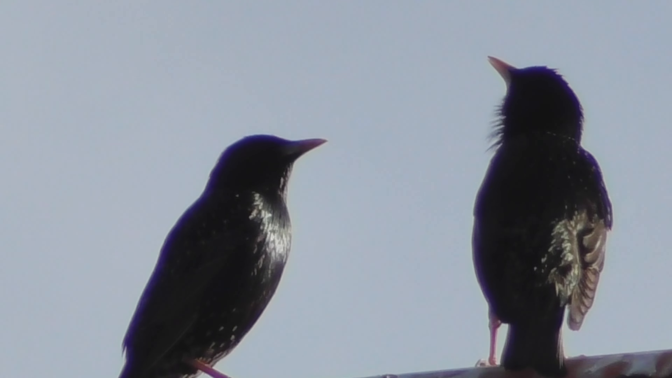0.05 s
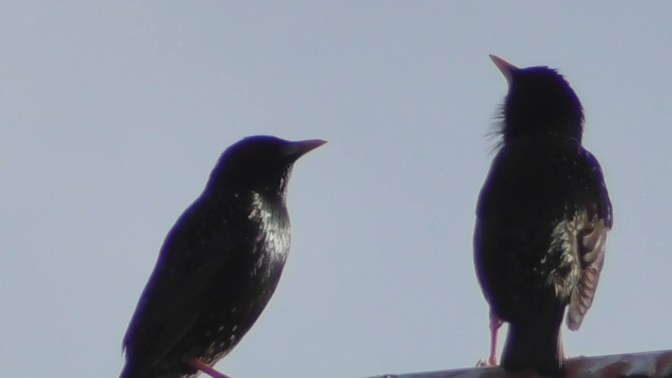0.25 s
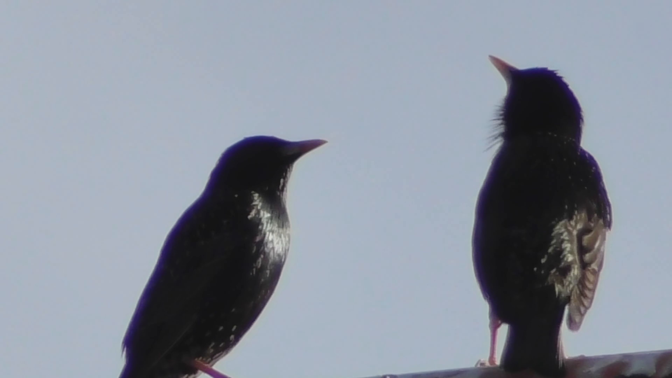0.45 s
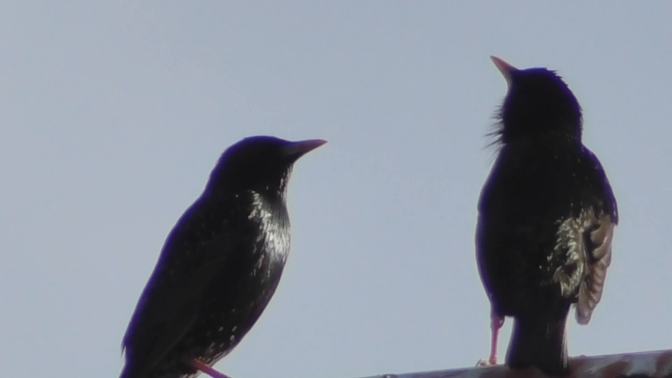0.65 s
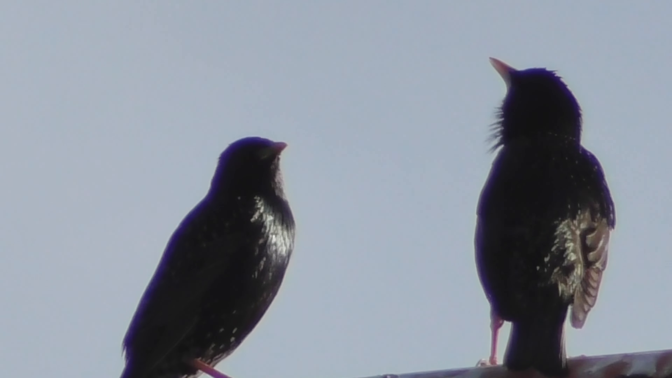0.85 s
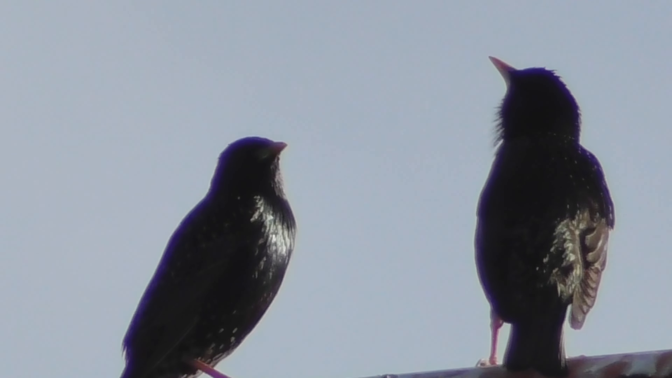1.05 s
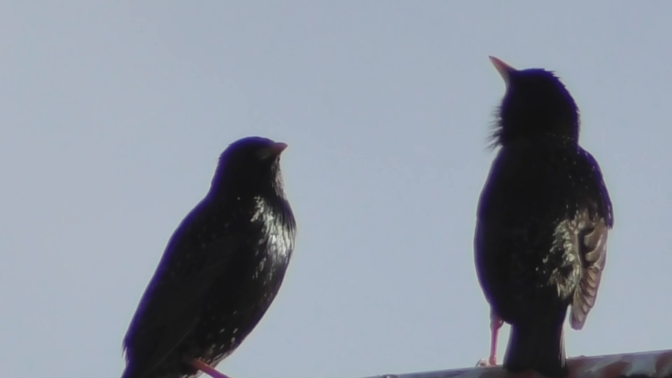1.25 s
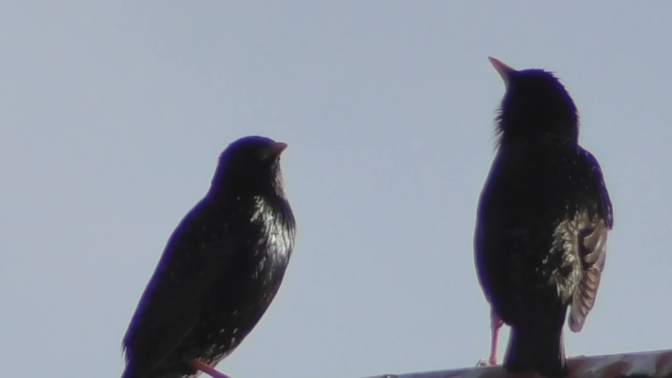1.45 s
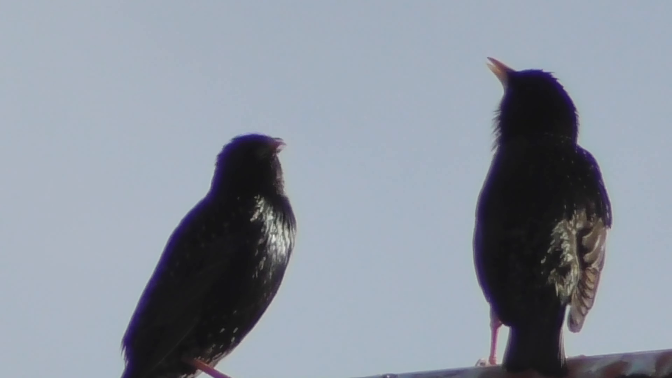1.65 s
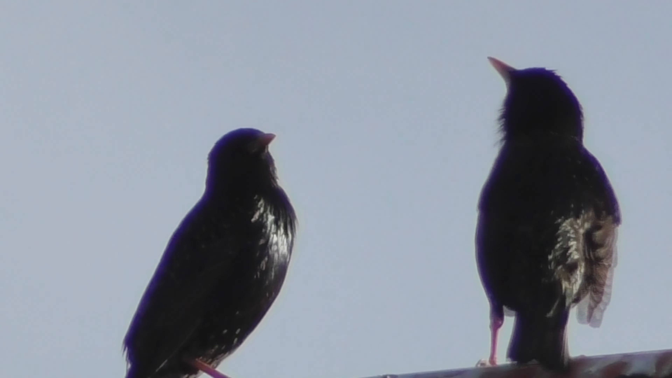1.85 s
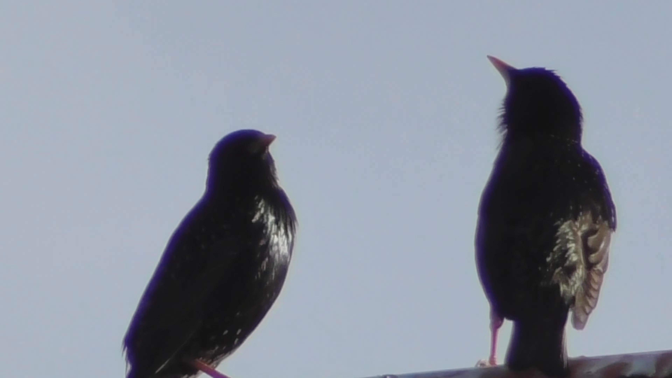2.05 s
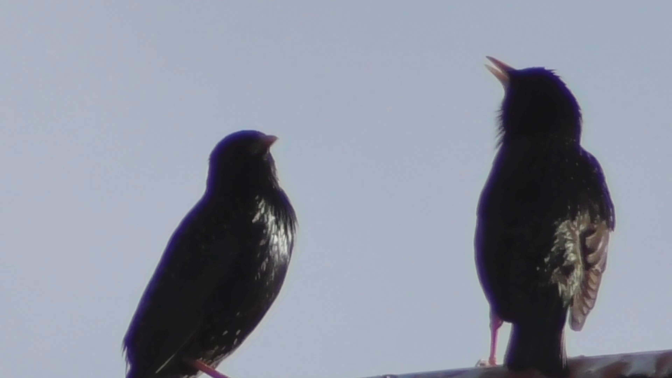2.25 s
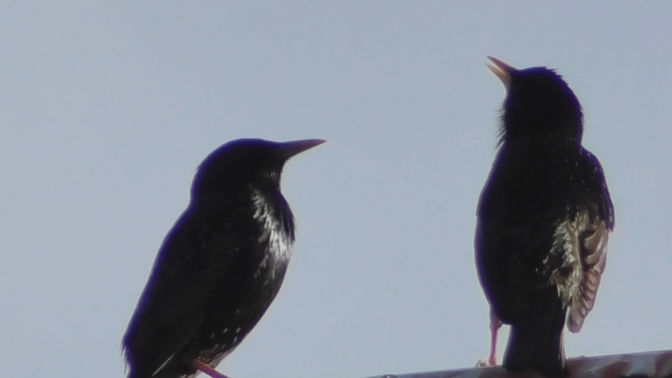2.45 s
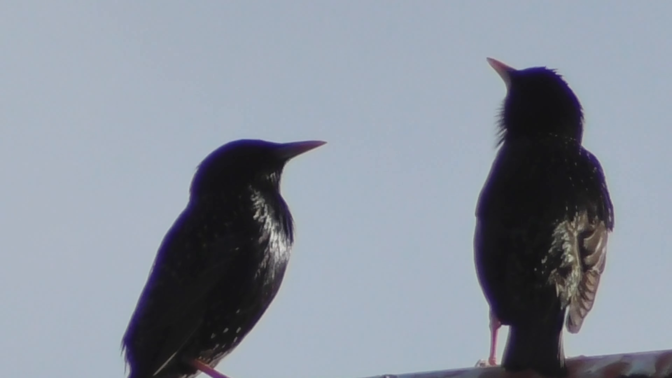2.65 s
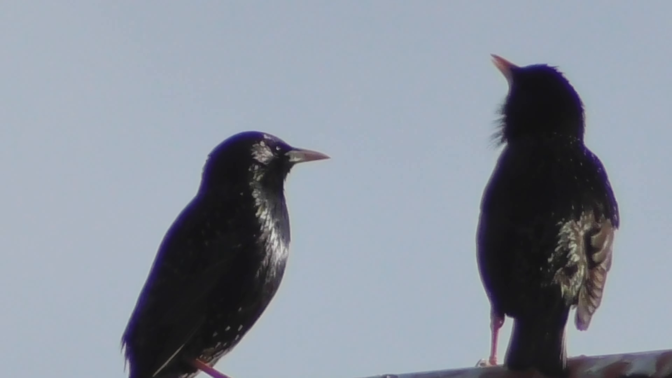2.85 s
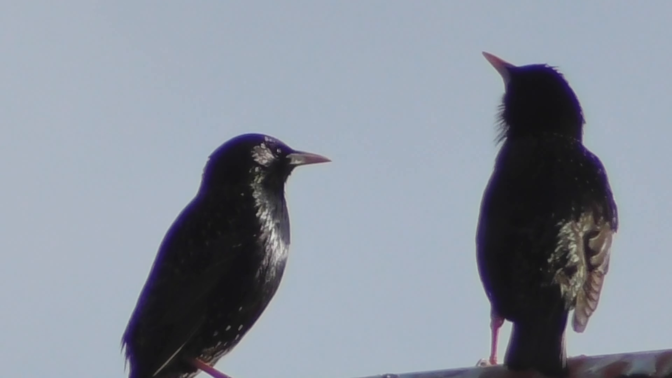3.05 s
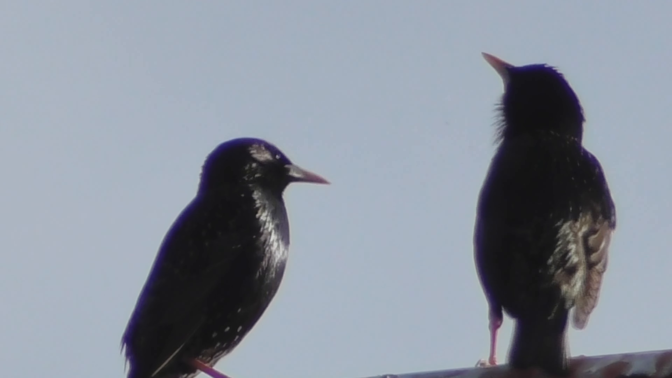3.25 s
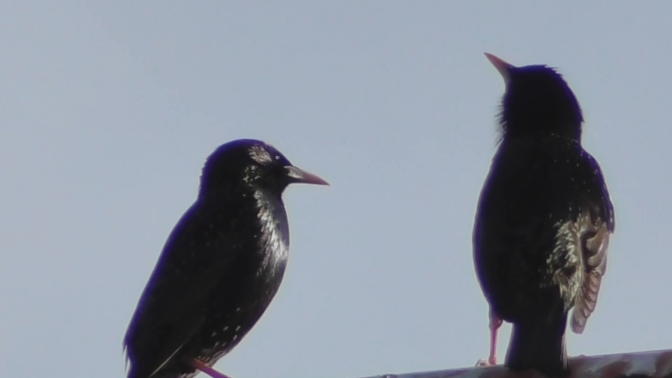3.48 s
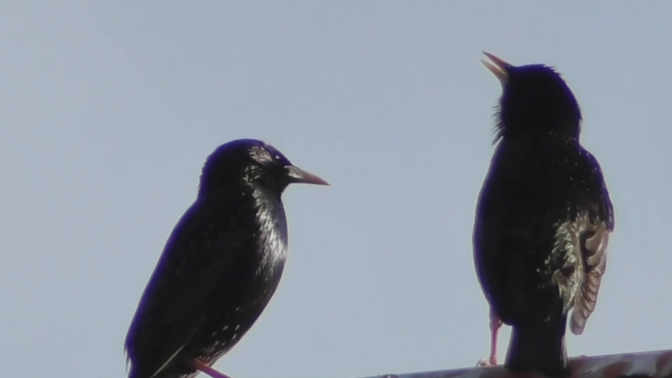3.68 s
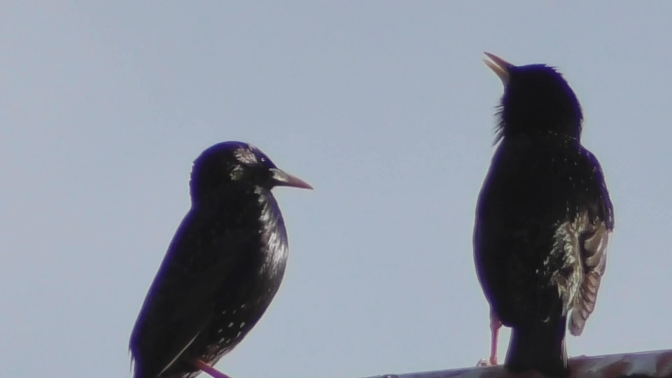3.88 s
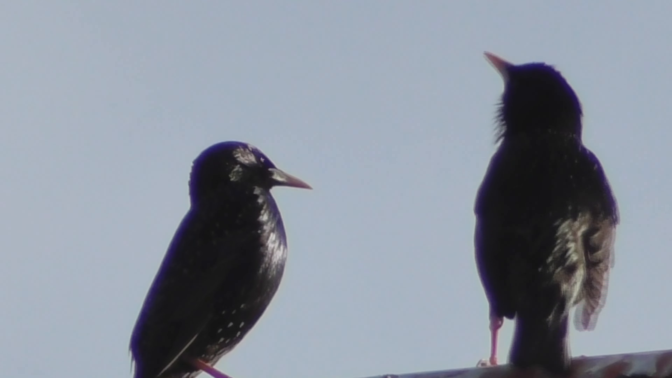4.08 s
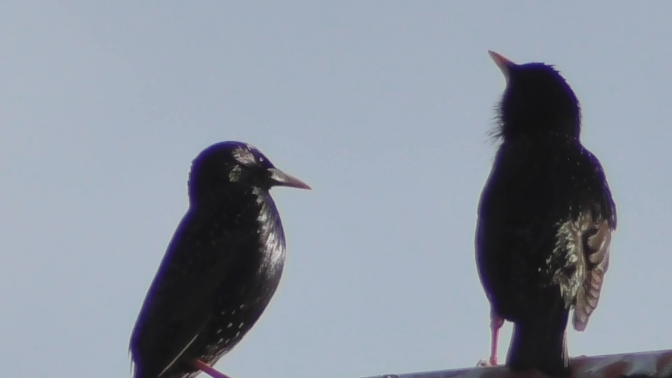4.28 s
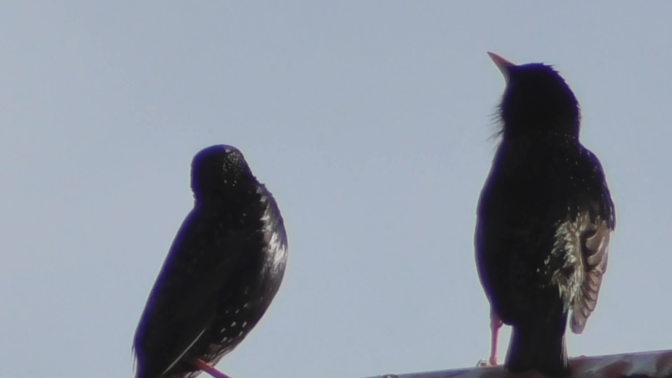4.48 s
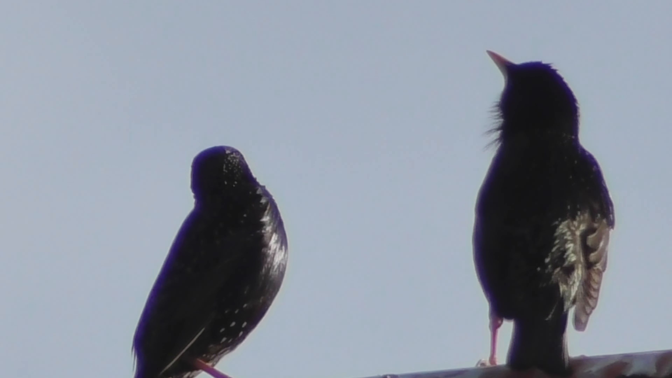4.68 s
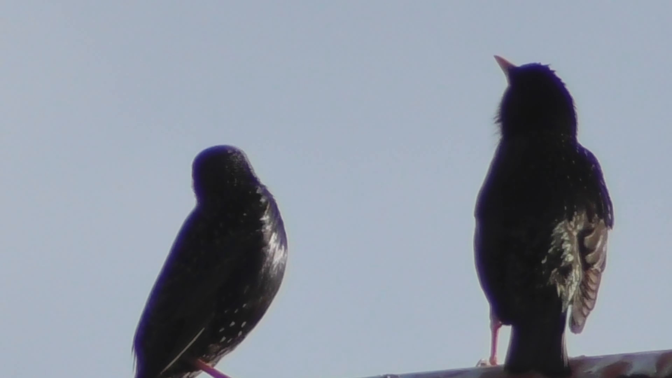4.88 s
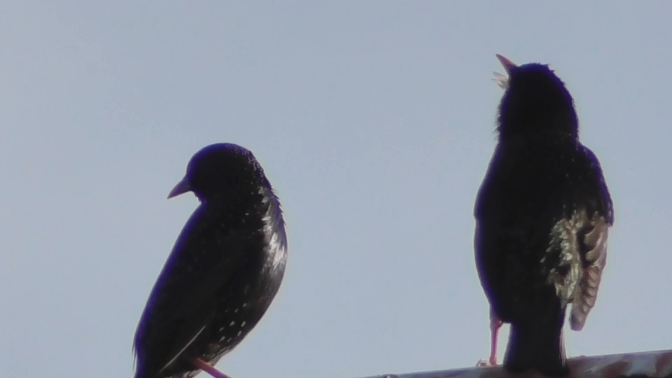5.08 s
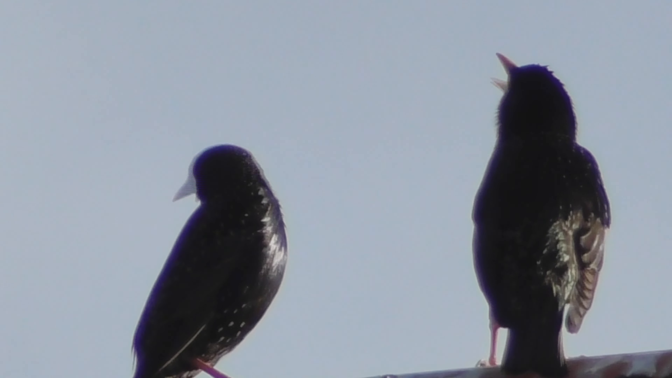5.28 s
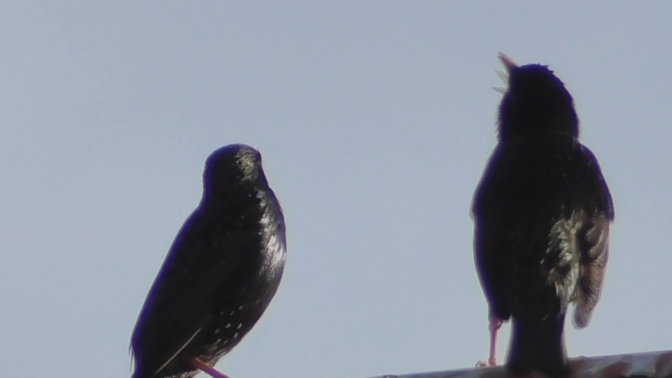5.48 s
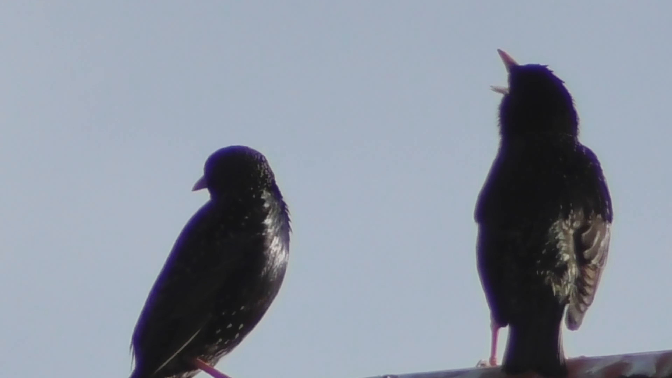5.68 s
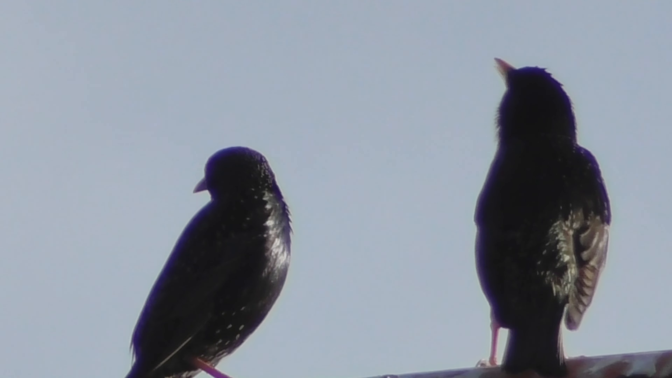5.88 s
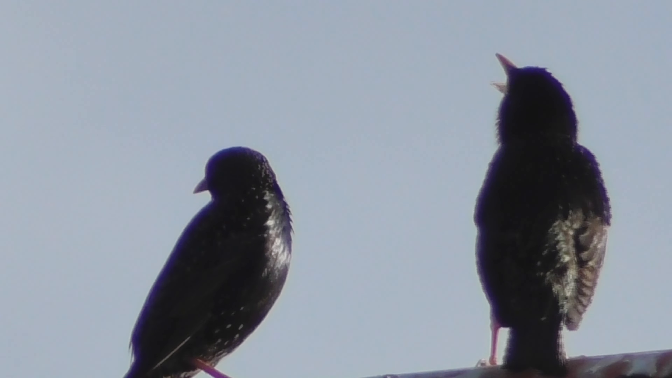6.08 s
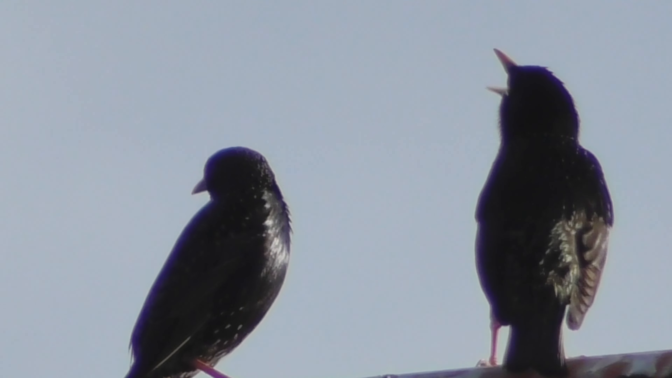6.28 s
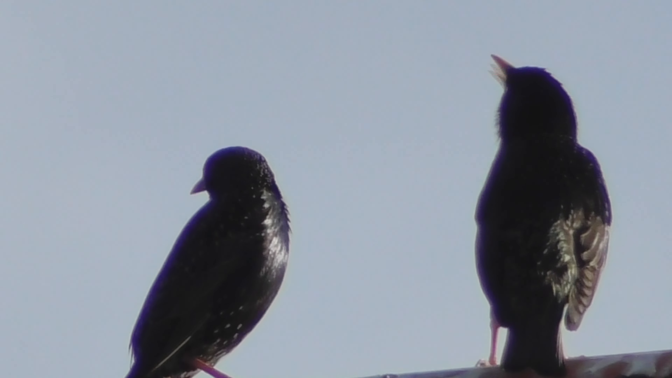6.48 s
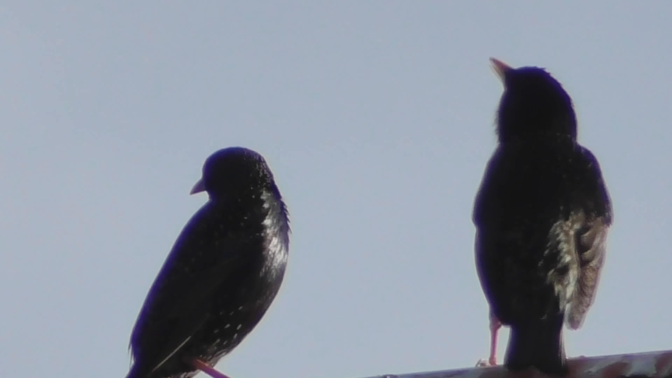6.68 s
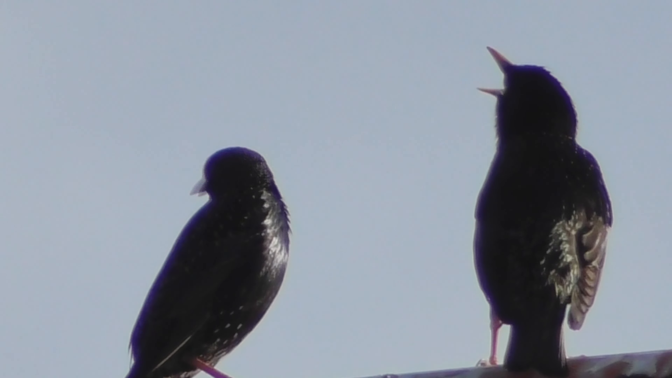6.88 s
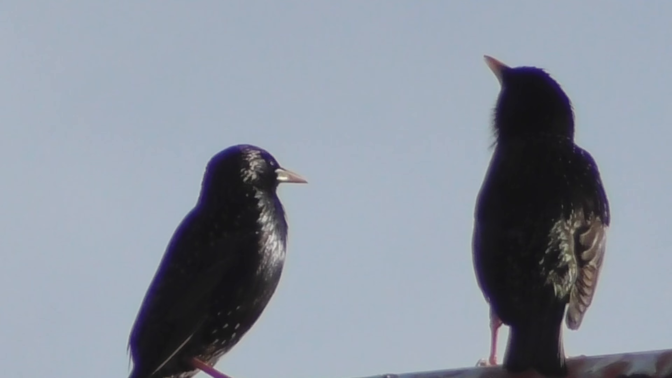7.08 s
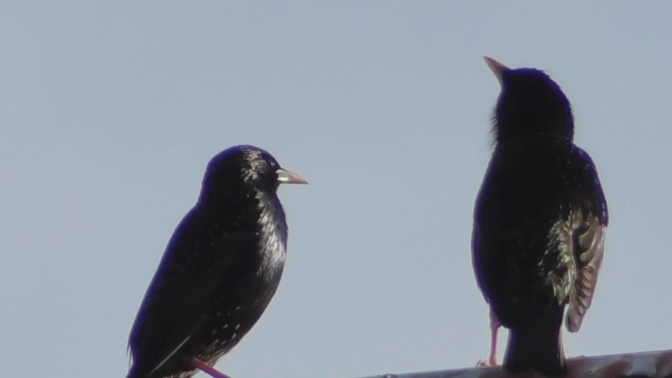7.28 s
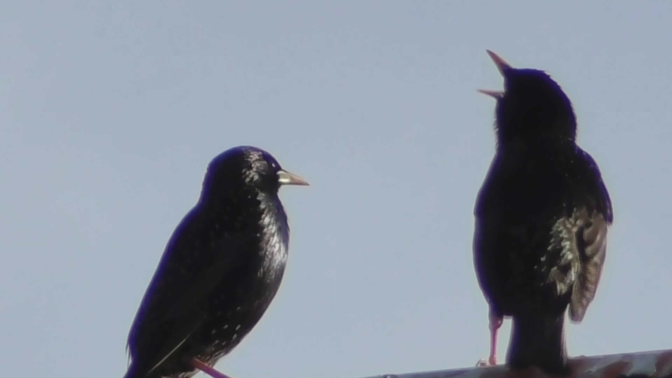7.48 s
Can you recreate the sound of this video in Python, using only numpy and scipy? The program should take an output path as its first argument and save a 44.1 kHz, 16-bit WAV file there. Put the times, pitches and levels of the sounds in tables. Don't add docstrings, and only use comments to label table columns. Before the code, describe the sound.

A small stereo microphone below a roof edge picks up a starling close by, slightly right, and sparrows scattered further away, blurred by wall reflections. Chirps and quiet rattles, squeaks and ticks continue over far-off road hum and hiss. A held high note with a fast warble then introduces three very bright, strong whistles that ripple up and down, separated by snaps and rasping chirps, before faint clicking closes the passage.

```python
import sys
import numpy as np
from scipy import signal
from scipy.fft import rfft, irfft
from scipy.io import wavfile
from scipy.ndimage import uniform_filter1d

SR = 44100
rng = np.random.default_rng(int(sys.argv[2]) if len(sys.argv) > 2 else 0)


def amplitude_ratio(level_db):
    exponent = np.asarray(level_db, float) / 20
    return 10 ** exponent


def generate_wav(sig):
    pcm = np.round(np.clip(np.atleast_2d(sig).T, -1, 1) * 32767).astype(np.int16)
    wavfile.write(sys.argv[1], SR, pcm)


N = 332073
TIME = np.arange(N) / SR


def coloured(x, spectrum):
    hz, db = np.transpose(spectrum)
    grid = np.fft.rfftfreq(len(x), 1 / SR) + 1
    gain = amplitude_ratio(np.interp(np.log(grid), np.log(hz), db))
    y = irfft(rfft(x) * gain, len(x))
    return y / y.std()


def drift(rate):
    lowpass = signal.butter(2, rate, fs=SR, output="sos")
    y = signal.sosfilt(lowpass, rng.standard_normal(N + SR))[SR:]
    return y / y.std()


def bandpass(x, low_hz, high_hz):
    return signal.sosfilt(signal.butter(3, [low_hz, high_hz], "band", fs=SR, output="sos"), x)


def resonance(x, hz, width_hz):
    r = np.exp(-np.pi * width_hz / SR)
    zeros = [(1 - r * r) / 2, 0, (r * r - 1) / 2]
    poles = [1, -2 * r * np.cos(2 * np.pi * hz / SR), r * r]
    return signal.lfilter(zeros, poles, x + 1e-18)


def controls(rows, t, smooth_s=0.0023):
    s, hz, db = np.transpose(rows)
    sounding = (t >= s[0]) * (t <= s[-1])
    height = np.sqrt(2) * amplitude_ratio(np.interp(t, s, db)) * sounding
    span = max(int(smooth_s * SR), 1)
    return uniform_filter1d(np.interp(t, s, hz), span), uniform_filter1d(height, span)


def phase(hz):
    return 2 * np.pi * np.cumsum(hz) / SR


def voice(notes, second_db, third_db, wobble, flutter, throb_db=0.0):
    out = np.zeros(N)
    shake = 1 + wobble * drift(268)
    strength = (1 + flutter * drift(365)) * amplitude_ratio(throb_db * drift(60))
    for rows in notes:
        first = max(int(rows[0][0] * SR) - 300, 0)
        last = min(int(rows[-1][0] * SR) + 300, N)
        on = np.arange(first, last)
        hz, height = controls(rows, on / SR)
        turn = phase(hz * shake[on])
        overtones = amplitude_ratio(second_db) * np.sin(2 * turn) + amplitude_ratio(third_db) * np.sin(3 * turn)
        out[on] += height * (np.sin(turn) + overtones)
    return out * strength


def glides(rows):
    return [[(s, a, db - 5),
             (s + .3 * d, .7 * a + .3 * b, db),
             (s + .8 * d, .2 * a + .8 * b, db),
             (s + d, b, db - 7)] for s, d, a, b, db in rows]


def chirps(shape, rows):
    length_s = shape[-1][0]
    return [[(start + s, hz * factor, db + level_db + lean_db * s / length_s + catch_db * (k == 5))
             for k, (s, hz, db) in enumerate(shape)]
            for start, factor, level_db, lean_db, catch_db in rows]


# (frequency [Hz], density [dB per Hz])
HUM = [(12, -30), (20, -5.5), (107, 6), (228, 2.5), (296, -2), (337, -4.5), (377, 0), (489, -4),
       (547, -0.5), (623, -16.5), (1190, -14), (1490, -23.5), (1700, -77), (2210, -83), (3740, -120)]
# (frequency [Hz], density [dB per Hz])
SWELL = [(120, -29), (200, -14.5), (348, 0), (495, -2.5), (615, -3), (1050, -9.5), (1600, -23),
         (3180, -22.5), (3700, -17), (4760, -26.5), (7610, -21.5), (11000, -26.5), (14300, -56),
         (22000, -120)]
# (nearest time [s], level [dB], passing time [s])
CARS = [
    (0.24, -51, 0.1),
    (0.43, -57.5, 0.1),
    (1.0, -70.5, 0.73),
    (2.128, -73, 0.4),
    (4.18, -68.5, 0.19),
    (5.5, -72.5, 0.49),
    (4.26, -68, .03),
    (6.95, -65, 0.38),
    (7.2, -73, 0.026),
]
# (frequency [Hz], width [Hz], level [dB])
DRONES = [
    (294, 14, -73.5),
    (368.7, 2.4, -80),
    (2176, 140, -88),
    (5540, 14, -89.5),
]


def street():
    lull_db, hum_db = -75.5, -68.5
    cars = amplitude_ratio(lull_db) + sum(amplitude_ratio(db) / (1 + ((TIME - s) / pass_s) ** 2) for s, db, pass_s in CARS)
    swell = coloured(rng.standard_normal(N), SWELL) * cars * amplitude_ratio(-3.5 + 1.5 * drift(8.7))
    hum = coloured(rng.standard_normal(N), HUM) * amplitude_ratio(hum_db + 0.13 * drift(14))
    white = rng.standard_normal(N)
    for hz, width_hz, db in DRONES:
        drone = resonance(white, hz, width_hz)
        hum += amplitude_ratio(db) * drone / drone.std()
    return swell + hum


def walls(x, t60, gap_s, side_db, late_db):
    t = np.arange(int(1.2 * SR)) / SR
    dying = amplitude_ratio(-60 * t / t60) + amplitude_ratio(late_db - 60 * t / 0.88)
    lumps = amplitude_ratio(1.57 * drift(66)[:len(t)])
    shape = dying * lumps * np.clip(t / gap_s, 0, 1) ** 2
    mid, side = rng.standard_normal((2, len(t))) * shape / np.sqrt(np.sum(shape ** 2))
    return np.array([signal.fftconvolve(x, mid + sign * amplitude_ratio(side_db) * side)[:N] for sign in (1, -1)])


# (time [s], length [s], start pitch [Hz], end pitch [Hz], level [dB])
HIDDEN = [(0.0, 0.031, 2910, 4240, -68.5), (0.01, 0.04, 5230, 6560, -72), (.38, 0.1, 3895, 3507, -73.5),
          (.72, 0.056, 3630, 3610, -80.5), (1.24, 0.13, 3680, 3334, -82.5), (3.945, 0.049, 3730, 3900, -69),
          (7.0, 0.021, 3900, 3420, -78), (2.47, 0.11, 4280, 3340, -79), (2.6, 0.042, 4000, 3390, -89),
          (3.43, 0.12, 3930, 3570, -80), (4.25, 0.13, 2645, 2465, -79.5), (4.4, 0.25, 3524, 4000, -85),
          (5.33, 0.08, 3540, 3840, -80.5), (5.84, 0.16, 3710, 4135, -72.5)]
# (time from its start [s], pitch [Hz], level [dB])
SLUR = [
    (0.0, 3610, -10.5),
    (0.02, 4096, -1.5),
    (0.045, 4213, -4.5),
    (0.06, 3380, -2),
    (0.095, 4080, -9.5),
    (0.118, 3348, 1),
    (0.145, 3000, -13.5),
    (0.18, 2755, -18.5),
    (0.2, 2620, -40),
]
# (time [s], pitch factor, level [dB], lean to the end [dB], catch on the sixth point [dB])
SLUR_CHIRPS = [
    (2.105, 0.98, -57, 0.5, 0.44),
    (6.025, 0.95, -58.5, -0.5, 1.5),
]


def hidden_sparrows():
    notes = glides(HIDDEN) + chirps(SLUR, SLUR_CHIRPS)
    return voice(notes, second_db=-26, third_db=-30, wobble=.05, flutter=.5, throb_db=4.0)


# (time [s], length [s], start pitch [Hz], end pitch [Hz], level [dB])
BROKEN = [(.042, 0.028, 4780, 4820, -53), (.058, 0.016, 5250, 5900, -59.5), (.076, 0.028, 4040, 3630, -46),
          (.12, 0.021, 3650, 3783, -43.5), (.143, 0.028, 3700, 2470, -52.5),
          (1.881, 0.025, 4500, 4360, -57.5), (1.888, 0.012, 5000, 5500, -61),
          (1.904, 0.024, 4400, 3530, -50), (1.928, 0.025, 3650, 3800, -43), (1.95, 0.037, 3600, 2520, -57),
          (3.976, 0.02, 4500, 4920, -60), (3.992, 0.018, 5200, 5630, -56), (4.01, 0.029, 4050, 3755, -47.5),
          (4.061, .022, 3920, 3626, -44), (4.085, 0.034, 3500, 2516, -57.5),
          (6.428, 0.026, 4355, 3960, -51.5), (6.43, .03, 4650, 5540, -57), (6.455, 0.024, 4200, 3690, -45),
          (6.487, 0.029, 3900, 3657, -42), (6.513, 0.026, 3600, 2510, -51.5)]


def harsh_sparrow(blurred):
    rasps = [(c[0][0] + 0.00117, .05, 4900, 5700, -70) for c in chirps(ARCH, ARCH_CHIRPS)]
    rasps += [(s - .027, .03, 4700, 5900, -77) for s, db in NEAR_CHIRPS]
    harsh = voice(glides(BROKEN) + glides(rasps), second_db=-26, third_db=-30,
                  wobble=.035, flutter=.5, throb_db=2.5)
    effort = np.sqrt(uniform_filter1d(harsh ** 2 + blurred ** 2, 400) + 1e-18)
    breath = resonance(coloured(rng.standard_normal(N), HISS), 7000, 5800)
    band_shaped = harsh + 0.78 * resonance(harsh, 4570, 1460) - 0.19 * resonance(harsh, 3640, 420)
    return amplitude_ratio(-4.5) * band_shaped + amplitude_ratio(-14.5) * effort * breath


# (time from its start [s], pitch [Hz], level [dB])
ARCH = [
    (0.015, 2500, -27),
    (0.035, 3050, -22),
    (0.042, 3397, -2),
    (0.062, 3902, -1.3),
    (0.076, 3000, -4),
    (0.081, 2350, -24),
    (0.1, 3200, -8),
    (0.115, 3400, -7),
    (0.15, 2300, -16.5),
]
# (time [s], pitch factor, level [dB], lean to the end [dB], catch on the sixth point [dB])
ARCH_CHIRPS = [
    (0.866, 1, -48.5, 0.0, 1.4),
    (2.83, 0.99, -49.5, 0.0, 1),
    (5.535, 0.98, -48, 0.002, 0.0),
]


def arched_sparrow():
    return voice(chirps(ARCH, ARCH_CHIRPS), second_db=-30, third_db=-30, wobble=0.02, flutter=0.35)


# (time from its start [s], pitch [Hz], level [dB])
ZIGZAG = [
    [(0.0, 3653, -10), (0.007, 4236, -3), (0.016, 4450, -9.5), (0.019, 3875, -2.5), (0.025, 3180, -8),
     (0.039, 3560, -1)],
    [(0.049, 2667, -27), (0.06, 2980, -6), (0.074, 3420, -4), (0.079, 3150, -2.5), (0.087, 3070, -13),
     (0.093, 2365, -7), (0.1, 2710, -14), (0.108, 2090, -14.5)],
]
# (time [s], level [dB])
NEAR_CHIRPS = [
    (1.792, -56.5),
    (3.27, -57),
    (5.025, -57.5),
]


def near_sparrow():
    notes = [np.array(syllable) + [s, 0, db] for s, db in NEAR_CHIRPS for syllable in ZIGZAG]
    return voice(notes, second_db=-19, third_db=-24, wobble=0.023, flutter=0.15)


# (time [s], length [s], start
# pitch [Hz], end pitch [Hz], level [dB])
GLIDES = [(0.0, 0.035, 7370, 6800, -64.5), (0.76, 0.082, 7520, 6800, -68.5),
          (0.967, 0.071, 7300, 6200, -74), (1.12, 0.018, 6600, 5940, -78), (1.156, 0.04, 5900, 4900, -76),
          (3.305, 0.021, 7000, 9300, -69), (4.67, .027, 7000, 8160, -74), (4.682, 0.015, 8200, 9200, -74),
          (4.669, 0.026, 3320, 4610, -70.5), (4.68, 0.013, 3060, 3500, -75), (5.056, .03, 7050, 8210, -71),
          (5.516, 0.034, 3900, 4450, -66.5), (5.897, 0.025, 4420, 5900, -59.5),
          (5.907, 0.018, 4000, 4130, -55), (7.203, 0.042, 3500, 2600, -74), (5.35, 0.088, 7000, 7300, -66),
          (5.36, .06, 9300, 9650, -75), (6.075, .035, 9900, 10200, -72), (5.658, 0.046, 1150, 1260, -83)]
# (time [s], start pitch [Hz], level [dB])
DROPS = [
    (2.662, 5760, -83),
    (3.04, 7260, -72),
    (3.39, 9100, -70.5),
    (3.392, 5900, -72),
    (3.722, 5600, -79),
    (4.415, 7200, -74),
    (4.763, 9300, -89),
    (4.764, 5500, -75),
]
# (time [s], length [s], pitch [Hz], level [dB])
HOLDS = [
    (3.07, 0.086, 5800, -77),
    (3.44, 0.12, 7160, -85),
    (3.707, .05, 7050, -84),
    (3.87, 0.057, 7150, -82),
    (4.411, 0.057, 7540, -73),
    (4.427, 0.15, 5720, -84),
    (4.86, 0.029, 8050, -84),
    (4.572, 0.052, 7870, -73.5),
    (4.752, 0.046, 7640, -75.5),
    (7.18, 0.046, 2164, -78),
]
# (time [s], length [s], start pitch [Hz], level [dB])
FLICKS = [
    (3.665, 0.032, 7100, -82),
    (3.817, 0.032, 7200, -79),
    (4.183, .025, 7750, -71.5),
    (4.24, 0.071, 7300, -72),
    (4.506, 0.036, 7900, -75),
    (5.893, 0.016, 1234, -62),
    (6.543, 0.012, 1234, -62),
]


def mutter():
    tick_s, tick_drop_hz, flick_lift = 0.0141, 1900, 1.075
    rows = GLIDES + [(s, tick_s, hz, hz - tick_drop_hz, db) for s, hz, db in DROPS]
    rows += [(s, d, hz, hz, db) for s, d, hz, db in HOLDS]
    rows += [(s, d, hz, hz * flick_lift, db) for s, d, hz, db in FLICKS]
    return voice(glides(rows), second_db=-30, third_db=-40, wobble=.006, flutter=.2, throb_db=1.5)


# (time [s], level [dB])
CROAKS = [
    (2.046, -71.5),
    (3.484, -72),
    (4.86, -74),
]


def knock(s, db):
    return [(s, 1350, db - 7), (s + 0.0043, 1150, db), (s + 0.0194, 1000, db - 3.5)]


def croaks():
    knocks = [knock(s + lag, db + lift) for s, db in CROAKS for lag, lift in [(0, 9.5), (.02, 9), (.033, -20)]]
    upper = [[(s, 1600, db - 14), (s + 0.025, 1620, db - 4.5), (s + 0.098, 1500, db - 17)] for s, db in CROAKS]
    return voice(knocks + upper, second_db=-40, third_db=-40, wobble=.06, flutter=.5)


# (time [s], length [s], rate [clicks per s], ring [Hz], level [dB])
RATTLES = [(.47, 0.021, 950, 7740, -63), (0.515, 0.03, 770, 7540, -57.5), (0.623, 0.035, 400, 7450, -67),
           (1.254, 0.13, 2500, 7700, -73.5), (1.394, 0.02, 1800, 7470, -62.5),
           (1.412, 0.071, 830, 7600, -72.5), (1.395, 0.018, 2700, 5400, -74),
           (2.933, 0.097, 267, 8000, -60.5), (4.283, 0.14, 1900, 7730, -69.5),
           (5.88, 0.094, 710, 5800, -59), (7.135, 0.06, 330, 3830, -68), (7.242, 0.078, 250, 3360, -67),
           (7.344, .03, 340, 4010, -69), (7.339, .03, 900, 6900, -76)]


def rattles():
    out, chance = np.zeros(N), rng.random(N)
    sizes = rng.standard_normal(N) * amplitude_ratio(1.0 * drift(41) + 9.0)
    shape = rng.integers(0, 3, N)
    for s, d, per_s, hz, db in RATTLES:
        a, b = round(s * SR), round((s + d + .02) * SR)
        swell = np.sin(np.pi * np.clip((TIME[a:b] - s) / d, 0, 1)) ** .5
        clicks = sizes[a:b] * (chance[a:b] < per_s / SR) * swell
        for k, lift in enumerate((.95, 1, 1.09)):
            ring = resonance(clicks * (shape[a:b] == k), hz * lift, .07 * hz)
            out[a:b] += amplitude_ratio(db) * 16 * resonance(ring, hz * lift, .1 * hz)
    return out


# (time [s], peak level [dB], upper edge [Hz])
CLICKS = [
    (0.311, -40.5, 910),
    (0.3273, -38, 9300),
    (0.3267, -48, 2220),
    (1.398, -57, 9500),
    (5.151, -59, 1780),
    (5.458, -56, 7100),
    (5.608, -41, 7400),
    (6.258, -44, 8000),
    (6.833, -47, 9400),
    (6.832, -51.5, 5000),
]


def beak():
    out, n = np.zeros(N), np.arange(200)
    for (s, db, top_hz), snap in zip(CLICKS, rng.standard_normal((len(CLICKS), 200))):
        snap = bandpass(snap * np.exp(-n / (0.00096 * SR)), 0.5 * top_hz, top_hz)
        a = round(s * SR)
        out[a:a + 200] += amplitude_ratio(db) * snap / abs(snap).max()
    return out


# (time [s], peak level [dB], ring [Hz])
TICKS = [
    (7.1388, -70, 3570),
    (7.1632, -65, 3720),
    (7.2011, -65, 3259),
    (7.282, -63, 3280),
    (7.3418, -69, 4000),
    (7.351, -70, 4100),
    (7.4042, -71, 3300),
    (7.4142, -75, 3370),
    (7.4321, -65, 3350),
]
# (time [s], peak level [dB])
CRACKS = [
    (5.6266, -65),
    (5.8047, -44),
    (6.0132, -50),
    (6.1365, -53),
    (6.2761, -57),
    (6.4492, -58),
    (7.1117, -51),
]


def ticks():
    out, snaps = np.zeros(N), np.zeros(N)
    n = np.arange(400) / SR
    for s, db, hz in TICKS:
        a = round(s * SR)
        out[a:a + 400] += amplitude_ratio(db + 3.5) * np.sin(2 * np.pi * hz * n) * np.exp(-n / 0.004)
    for (s, db), snap in zip(CRACKS, rng.standard_normal((len(CRACKS), 400))):
        a = round(s * SR)
        snaps[a:a + 400] += amplitude_ratio(db + 0.3) * snap * np.exp(-n / .003)
    return out + bandpass(snaps, 9500, 12800)


# (time [s], pitch [Hz], level [dB])
HELD = [
    (5.157, 7500, -58),
    (5.175, 5550, -56.5),
    (5.19, 5540, -56),
    (5.3, 5820, -63),
    (5.45, 5930, -58.5),
    (5.55, 6100, -67.5),
]
# (time [s], centre pitch [Hz], level [dB])
WARBLE = [
    (5.195, 8640, -72),
    (5.25, 8660, -64.5),
    (5.3, 8820, -62.5),
]


def two_voices():
    warble_hz, swing_hz = 76, 554
    hz, height = controls(HELD, TIME)
    held = phase(hz * (1 + .007 * drift(200)))
    hz, warble_height = controls(WARBLE, TIME)
    warble_height = warble_height * (1 + 0.54 * drift(250))
    swing = swing_hz * np.cos(2 * np.pi * warble_hz * (TIME - 5.258))
    warble = phase(hz + 120 * drift(153) + swing)
    peeps = resonance(warble_height * np.sin(warble - held), 3470, 400) * amplitude_ratio(-2.5)
    height = height * (1 + .5 * drift(143.9))
    overtone = amplitude_ratio(-24 + 4 * drift(30)) * np.sin(2 * held)
    return height * (np.sin(held) + overtone) + warble_height * np.sin(warble) + peeps


# (trough time [s], trough [Hz], shelf [Hz], crest [Hz], level [dB])
WAVERS = [
    (5.662, 6970, 7120, 7650, -33),
    (5.711, 6920, 7490, 7830, -31),
    (6.308, 7160, 7380, 7750, -32),
    (6.363, 7210, 7660, 7950, -30),
    (6.885, 7080, 7420, 7760, -32.5),
    (6.939, 7110, 7620, 7920, -32),
    (7.001, 7220, 7720, 7930, -32),
]


def long_whistle(start, last, last_hz, end, level_db):
    climb_hz_per_s, sag_hz = 27100, 60.5
    step_s, crest_s, drop_s = 0.0114, 0.00682, 0.01204
    rows = [(start, 9400, level_db - 7), (start + 0.02, 7900, level_db)]
    inside = [w for w in WAVERS if start < w[0] < last]
    next_troughs = [w[0] for w in inside[1:]] + [last]
    for (s, low_hz, shelf_hz, crest_hz, db), after in zip(inside, next_troughs):
        drop = after - drop_s
        rows += [(s, low_hz, db - 3),
                 (s + (shelf_hz - low_hz) / climb_hz_per_s, shelf_hz, db - 5.5),
                 (drop - crest_s - step_s, shelf_hz - sag_hz, db),
                 (drop - crest_s, crest_hz, db),
                 (drop, crest_hz, db - 2)]
    return rows + [(last, last_hz, level_db), (last + 0.034, 8510, level_db - 4), (end, 8510 + 153, level_db - 7)]


# (start time [s], last trough time [s], its pitch [Hz], end time [s], level [dB])
WHISTLES = [
    (5.619, 5.776, 7220, 5.833, -32),
    (6.267, 6.424, 7130, 6.484, -32.5),
    (6.842, 7.062, 7325, 7.12, -33),
]
# (time [s], pitch [Hz], level [dB])
DIVES = [
    [(5.314, 9400, -72), (5.318, 8800, -38), (5.328, 7670, -35.5), (5.338, 6550, -54.5), (5.355, 5940, -67)],
    [(6.011, 8950, -36), (6.019, 8020, -37.5), (6.026, 7590, -40.5), (6.033, 6500, -57), (6.043, 6460, -64)],
]
# (time [s], pitch [Hz], level [dB])
SCOOP = [
    (6.042, 6380, -77),
    (6.109, 6280, -53),
    (6.122, 7300, -45),
    (6.135, 8400, -34),
    (6.144, 8330, -34),
    (6.159, 7380, -39),
    (6.17, 7550, -38),
    (6.18, 7950, -61),
]
# (time [s], length [s])
DIPS = [
    (5.785, 0.0015),
    (6.013, 0.00088),
    (6.374, 0.002),
]


def whistles():
    long = [long_whistle(*row) for row in WHISTLES]
    clean = voice(long + DIVES + [SCOOP], second_db=-50, third_db=-60, wobble=.002, flutter=.08)
    for s, d in DIPS:
        clean = clean * (1 - np.exp(-((TIME - s) / d) ** 2))
    below = [np.array(rows) + [0, -1050, -32] for rows in long[1:]]
    return clean + voice(below, second_db=-50, third_db=-60, wobble=0.012, flutter=0.3, throb_db=1.5)


def scene():
    background = street()
    blurred, arched = hidden_sparrows(), arched_sparrow()
    harsh = harsh_sparrow(blurred)
    far = amplitude_ratio(3.5) * arched + amplitude_ratio(1.5) * harsh + amplitude_ratio(-3) * blurred
    far_echo = amplitude_ratio(1.5) * arched + harsh + amplitude_ratio(4) * blurred
    near = near_sparrow()
    starling = mutter() + croaks() + rattles() + beak() + ticks() + two_voices() + whistles()
    tails = walls(amplitude_ratio(-10.5) * starling + amplitude_ratio(-0.5) * near, t60=0.52, gap_s=0.023, side_db=-19.0, late_db=-37)
    tails += walls(amplitude_ratio(1.9) * far_echo, t60=0.54, gap_s=0.0054, side_db=-15.0, late_db=-16.5)
    pan = amplitude_ratio(np.array([[-.72], [.72]]))
    return starling * pan + near + far + tails + background


# (frequency [Hz], density [dB per Hz])
HISS = [(880, -17), (1500, -61), (1810, -6.5), (2160, 2.5), (2380, -7), (2840, -20), (3530, 0), (4050, 2.5),
        (4920, -9), (5220, -19), (5380, -3), (6110, -4.5), (7890, 3.5), (15100, 4), (15700, 6)]
# (frequency [Hz], density [dB per Hz])
SIDE_NOISE = [(12, -19), (20, -7.5), (149, -4), (385, -6), (772, -12.5), (1140, -18.5), (1640, -32.5),
              (2290, -33), (2710, -45), (6610, -44.5), (7390, -34), (8040, -45), (11000, -57.5),
              (15700, -47)]


def microphone_noise(dry):
    loud_db = 10 * np.log10(uniform_filter1d(dry.mean(axis=0) ** 2, int(0.031 * SR)) + 1e-9)
    side = coloured(rng.standard_normal(N), SIDE_NOISE) * amplitude_ratio(-66 + 0.34 * (loud_db + 62))
    hiss, own = (coloured(w, HISS) * amplitude_ratio(-69.5) for w in rng.standard_normal((2, N)))
    glare = resonance(own / own.std(), 11500, 5000) * amplitude_ratio(-74.5 + 0.23 * (loud_db + 68))
    difference = side + amplitude_ratio(-33) * own + amplitude_ratio(-9) * np.roll(glare, 999)
    return hiss + glare + difference * np.array([[1], [-1]])


def band_limit(x):
    return signal.sosfilt(signal.butter(12, 16300, fs=SR, output="sos"), x)


def record(dry):
    mix = dry + microphone_noise(dry)
    mix = signal.sosfilt(signal.cheby2(28, 50, 15840, fs=SR, output="sos"), mix)
    return band_limit(mix)


dry = scene()
out = record(dry)
generate_wav(out)
```